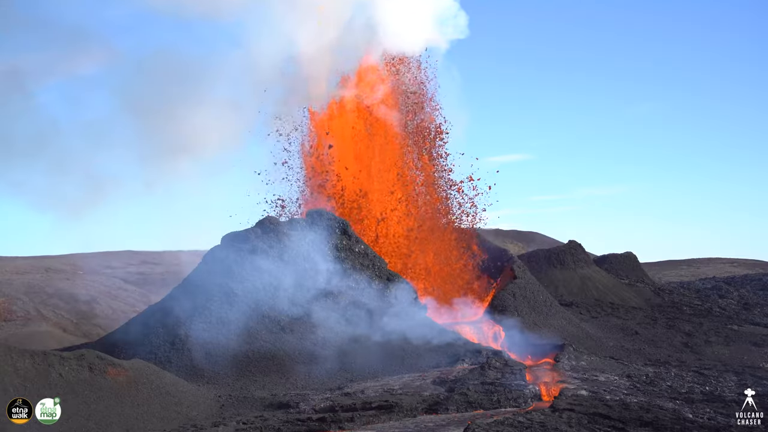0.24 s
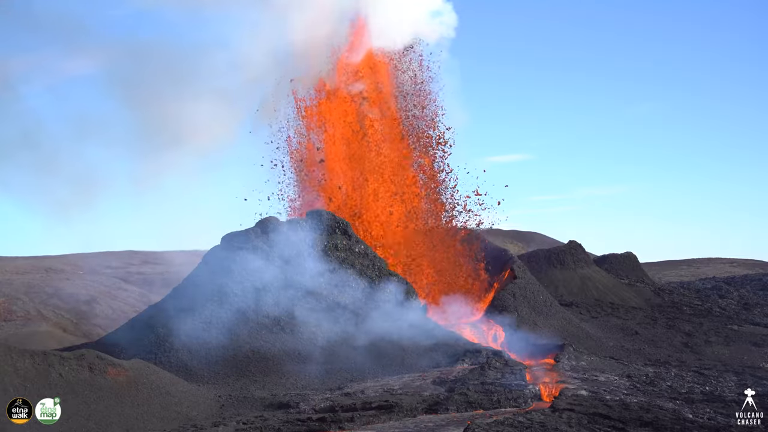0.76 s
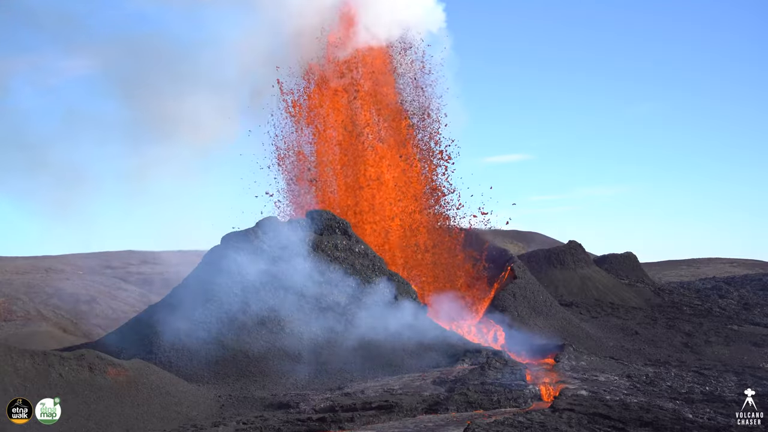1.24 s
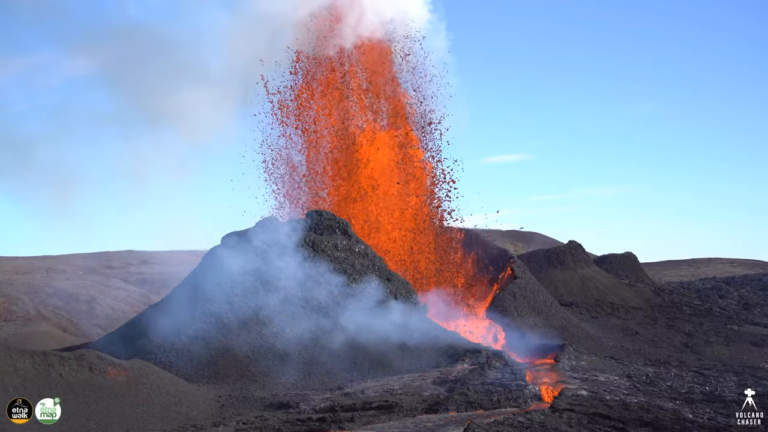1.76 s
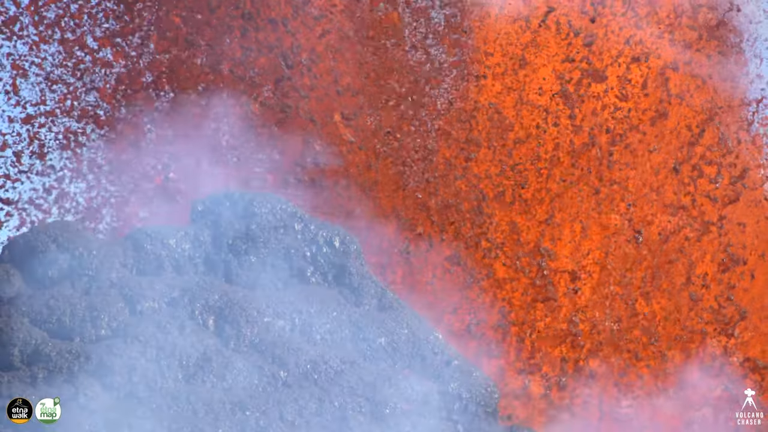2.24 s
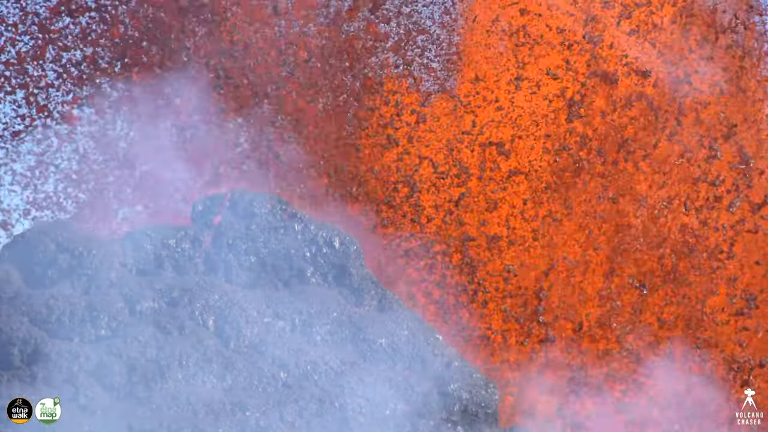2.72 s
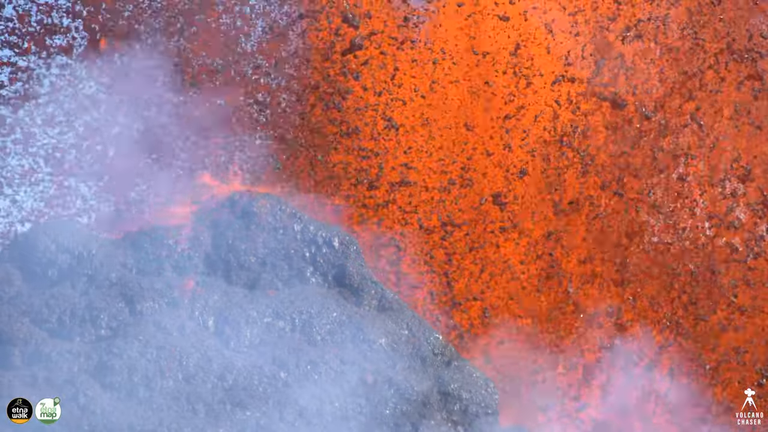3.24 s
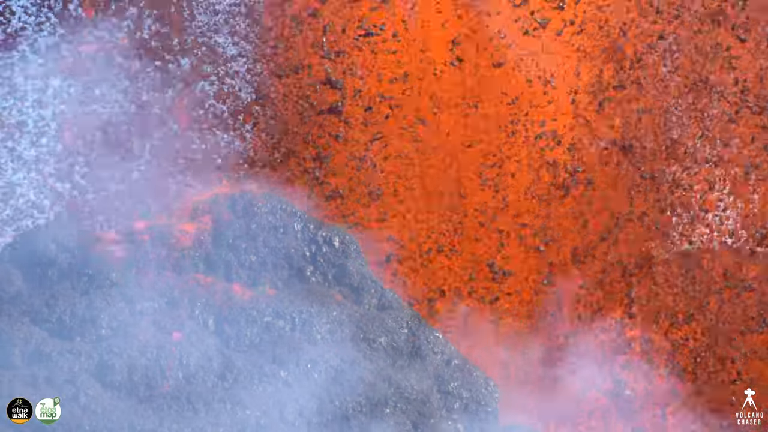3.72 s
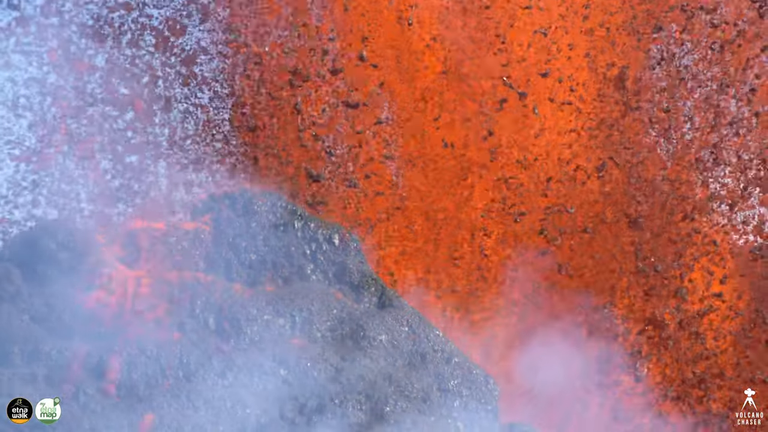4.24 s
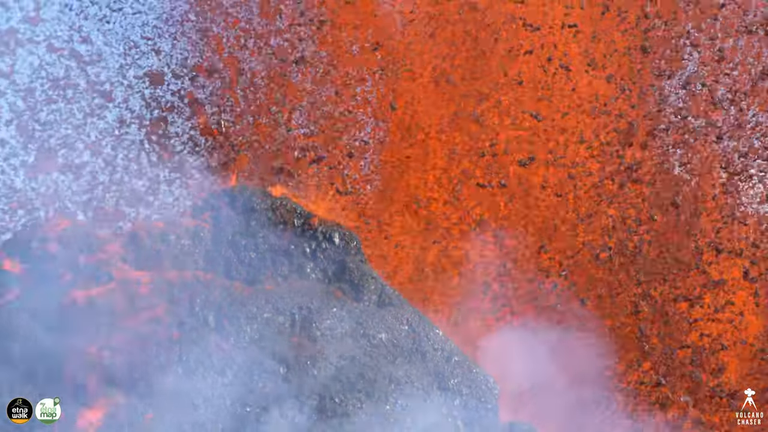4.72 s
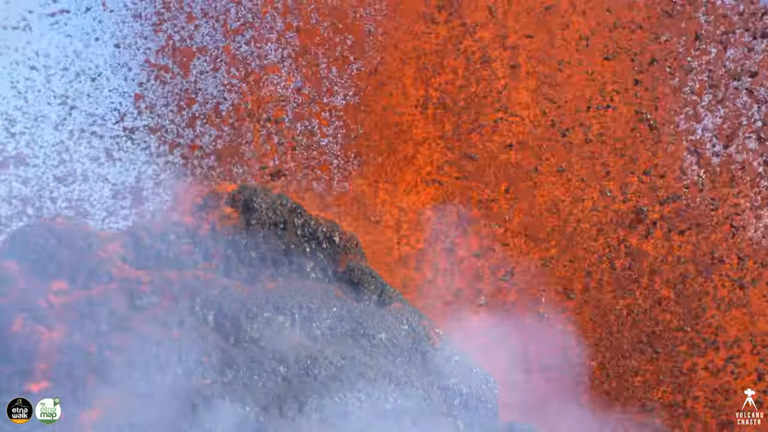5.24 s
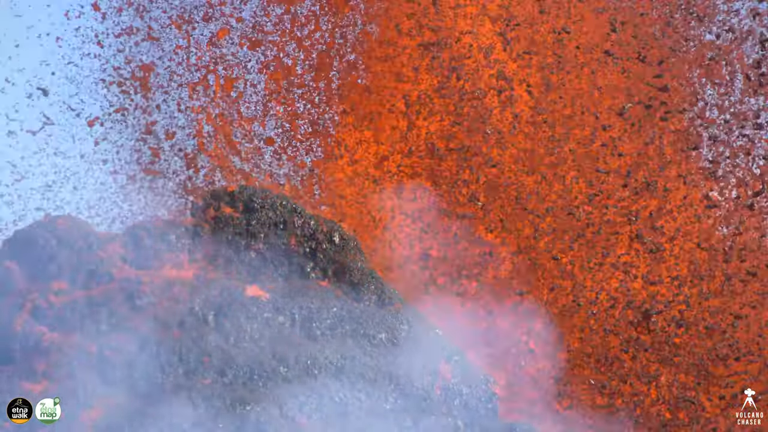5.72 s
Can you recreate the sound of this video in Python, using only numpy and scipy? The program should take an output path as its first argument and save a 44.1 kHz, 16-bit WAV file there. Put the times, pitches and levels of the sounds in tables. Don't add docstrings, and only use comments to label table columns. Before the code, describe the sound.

Steady broadband rumble and rush of a far volcanic vent, dark and without sparkle, nearly centred in a stereo outdoor pickup. An early surge is followed by a quieter, boomier stretch, then a gradual return to fuller, slightly clearer roaring. Low wind puffs bump the left side up to about three seconds and fade away. Sparse minute ticks fall close by, one distinct on the left past four seconds.

```python
import sys
import numpy as np
from scipy import signal
from scipy.fft import rfft, irfft, next_fast_len
from scipy.io import wavfile
from scipy.ndimage import uniform_filter1d, map_coordinates

SR = 44100
rng = np.random.default_rng(int(sys.argv[2]) if len(sys.argv) > 2 else 0)


def unload_wav(signal):
    wavfile.write(
        sys.argv[1],
        SR,
        np.round(np.clip(np.atleast_2d(signal).T, -1, 1) * 32767).astype(np.int16),
    )


def decibels_to_gain(level_db):
    exponent = np.asarray(level_db, float) / 20
    return 10 ** exponent


N = 263277

# time in seconds, jet strength in dB, vent throb over the jet in dB,
# clearness of the air path in dB.
FOUNTAIN_COURSE = [(0, -45.5, 2.5, -0.5), (.15, -43, 1.5, -0.5), (.4, -39.5, -2.5, -2),
                   (.82, -37.5, -1, -2.5), (1.1, -39.5, 1, -0.6), (1.6, -42.5, 0, -.5),
                   (1.95, -42.5, -0.5, .5), (2.3, -42, 2, 0.4), (2.8, -42, 4, -0.5), (3.3, -40, 4, 0),
                   (3.6, -38, 1, 0), (4.2, -38.5, 3, .5), (4.7, -37.5, 0.5, 0.8), (4.95, -37, 3, .5),
                   (5.2, -37.5, 0.5, 1), (5.6, -38, 2, 1), (5.97, -36, -0.5, 0.5)]
# frequency in Hz, level in dB per Hz.
ROAR_SPECTRUM = [(12, -43), (20, -10.5), (50, -4), (100, -1), (140, -2), (195, -10), (300, -9), (447, -9.5),
                 (620, -14.5), (1250, -17.5), (2500, -35.5), (3300, -46.5), (4000, -56.5), (4800, -68),
                 (7000, -100)]
# frequency in Hz, left over right in dB,
# lead of the right port in radians.
PORT_DIFFERENCES = [(59.5, 1.5, 0.23), (170, 0.5, 0.39), (215, 2, 0.44), (302, -2.5, -0.016),
                    (402, -0.4, 0.23), (550, -2.5, 0.32), (617, -1, 0.41), (670, -5, -0.038),
                    (780, 2.5, .08), (900, -2.5, 0.47), (1100, -1.5, -.07), (1530, -1, -0.14),
                    (1750, -3.5, -0.15), (2120, 0.5, -0.7), (2350, -1.5, 0)]
# frequency in Hz, likeness from 0 to 1.
PORT_LIKENESS = [(100, 1), (200, 0.99), (400, 0.99), (620, 1), (1200, .99), (1900, 1), (2600, 1),
                 (4000, 0.91)]
# time of the peak in seconds, peak level in dB, length in seconds.
GUST_SWELLS = [(.08, -49.5, 0.45), (.78, -47.5, .2), (1.05, -40, 0.22), (1.6, -52.5, .5), (1.97, -44, .25),
               (2.27, -42, 0.41), (2.7, -49, 0.45), (3.05, -49, .4), (3.6, -48, 0.18), (4.05, -52, .2),
               (4.75, -55.5, .3)]
# frequency in Hz, level in dB.
BUFFET_SPECTRUM = [(12, -13), (25, -1), (45, 1), (75, -14.5), (150, -22.5), (400, -60.5), (900, -120)]
# time in seconds, peak level in dB, length in ms, left over right in dB.
WIND_PUFFS = [
    (.95, -34, 30, 7),
    (2.122, -35, 22, 8),
    (2.288, -33.5, 27, 16),
    (2.6, -36, 28, 13),
    (2.931, -32, 32, 13),
]
# time of the peak in seconds, peak level in dB, length in seconds.
RUSTLE_SWELLS = [
    (2.3, -91.5, 2.6),
    (.1, -93, .4),
    (.95, -92, .6),
    (1.7, -94, .2),
    (2.04, -92, .25),
    (2.4, -94, 0.18),
    (2.62, -94, .2),
    (2.95, -91.5, .3),
    (3.36, -92, .2),
    (5.8, -98, .5),
]
# time in seconds, dull peak in dB, bright peak in dB, bright pitch in Hz,
# left over right in dB.
GRIT_GRAINS = [(0.3622, -73, -68.5, 9800, 1.5), (0.3891, -79, -72, 10800, 3),
               (0.5429, -62, -56.5, 10360, 2), (0.643, -67, -66, 8540, 1), (0.8403, -77, -66, 10500, -1),
               (1.2039, -75.5, -73.5, 9300, 7.5), (1.6335, -68, -70.5, 8500, 12),
               (1.8028, -56, -50, 9230, 16), (1.9042, -82, -56.5, 12340, -6.5),
               (1.91, -84, -72.5, 12600, -2), (2.1031, -78, -64.5, 12570, 3), (2.4926, -58, -76, 9300, 4),
               (2.6959, -50.5, -62.5, 9000, 7), (2.8381, -76, -81, 10500, 0),
               (2.9361, -61, -62, 10860, 0.5), (3.349, -66, -68, 10300, -1), (3.8395, -65.5, -65, 9400, -4),
               (4.2448, -33.5, -39, 9070, 13.5), (5.0226, -66.5, -57.5, 9300, 16),
               (5.1442, -68, -70.5, 10560, 1), (5.3587, -76.5, -68.5, 9200, 6),
               (5.6579, -66.5, -61, 9350, -1)]
# frequency in Hz, level in dB.
HISS_SPECTRUM = [(1000, -7), (5000, 0), (6500, -2.5), (8500, -2.5), (12000, -4), (16000, -10)]

BOOM_TOP_HZ, RUSH_FOOT_HZ, SPRAY_FOOT_HZ = 190, 740, 2200
BOOM_DB, BODY_DB, RUSH_DB, SPRAY_DB = 0.5, 0, -7.5, -24
RUSH_GROWS, SPRAY_GROWS = 0.96, 0.93
SPRAY_CLEARS = 2.8
CALM_DB, CALMING_DB_PER_S = -55.5, 1.1
FAINT_TOP_HZ = 12100


def unit(x):
    return x / np.sqrt(np.mean(x ** 2) + 1e-20)


def along(points, hz, axis=1):
    table = np.transpose(points)
    return np.interp(np.log(hz + 1), np.log(table[0] + 1), table[axis])


def curves(rows):
    s, *columns = np.transpose(rows)
    return [np.interp(np.arange(N) / SR, s, column) for column in columns]


def wobble(rate):
    knots = rng.standard_normal(int(N * rate / SR) + 4)
    return map_coordinates(knots, [np.arange(N) * rate / SR])


def swells(rows):
    t = np.arange(N) / SR
    power = sum(decibels_to_gain(2 * db) * np.exp(-(2 * (t - s) / length) ** 2 * 2) for s, db, length in rows)
    return np.sqrt(power)


def filtered(x, response):
    m = next_fast_len(N + SR // 2)
    hz = np.fft.rfftfreq(m, 1 / SR)
    return irfft(rfft(x, m) * response(hz), m)[..., :N]


def above(hz, edge_hz):
    return 1 / (1 + (edge_hz / (hz + 1)) ** 8)


def turbulence(patchy_db):
    z = signal.stft(rng.standard_normal((2, N + 1024)), nperseg=1024)[2]
    patches = uniform_filter1d(rng.standard_normal(z.shape[1:]), size=8, axis=0)
    patches = uniform_filter1d(patches, size=16, axis=1)
    return signal.istft(z * decibels_to_gain(patchy_db * unit(patches)), nperseg=1024)[1][:, :N]


def from_afar(share, patchy_db):
    def common_and_scattered(hz):
        colour = decibels_to_gain(along(ROAR_SPECTRUM, hz)) * np.sqrt(share(hz))
        turn = np.arccos(np.clip(along(PORT_LIKENESS, hz), -1, 1)) / 2
        return colour * [np.cos(turn), np.sin(turn)]

    def ports(hz):
        level = decibels_to_gain(along(PORT_DIFFERENCES, hz) / 2)
        left = level * np.exp(-.5j * along(PORT_DIFFERENCES, hz, axis=2))
        return np.array([left, 1 / left])

    mid, side = filtered(turbulence(patchy_db), common_and_scattered)
    return unit(filtered(np.array([mid + side, mid - side]), ports))


def fountain():
    jet_db, throb_db, clear_db = curves(FOUNTAIN_COURSE)
    surge_db = jet_db - jet_db.mean()

    def between(low_hz, high_hz):
        return lambda hz: above(hz, low_hz) * (1 - above(hz, high_hz))

    boom = from_afar(lambda hz: 1 - above(hz, BOOM_TOP_HZ), patchy_db=0.03)
    boom = boom * decibels_to_gain(surge_db + throb_db + BOOM_DB)
    body = from_afar(between(BOOM_TOP_HZ, RUSH_FOOT_HZ), patchy_db=1.1)
    body = body * decibels_to_gain(surge_db + BODY_DB)
    rush = from_afar(between(RUSH_FOOT_HZ, SPRAY_FOOT_HZ), patchy_db=0.96)
    rush = rush * decibels_to_gain(RUSH_GROWS * surge_db + clear_db + RUSH_DB)
    spray = from_afar(lambda hz: above(hz, SPRAY_FOOT_HZ), patchy_db=0.5)
    spray = spray * decibels_to_gain(SPRAY_GROWS * surge_db + SPRAY_CLEARS * clear_db + SPRAY_DB)
    return decibels_to_gain(jet_db.mean() + 0.25 * wobble(3)) * (boom + body + rush + spray)


def gusts():
    t = np.arange(N) / SR
    lumps = decibels_to_gain(3.3 * np.array([wobble(21), wobble(21)]))
    noise = filtered(rng.standard_normal((2, N)), lambda hz: decibels_to_gain(along(BUFFET_SPECTRUM, hz)))
    breeze = decibels_to_gain(CALM_DB - CALMING_DB_PER_S * t)
    strength = np.hypot(swells(GUST_SWELLS), breeze)
    wind = strength * decibels_to_gain(np.array([[2], [-2]])) * unit(lumps * noise)
    for s, db, ms, pan_db in WIND_PUFFS:
        u = (t - s) / (ms / 4000)
        push = (1 - u * u) * np.exp(-u * u / 2)
        wind = wind + decibels_to_gain(db + np.array([[pan_db / 2], [-pan_db / 2]])) * push
    return wind


def rustle():
    crackle = rng.standard_normal(N) * decibels_to_gain(3 * wobble(60))
    thin = filtered(crackle, lambda hz: np.sqrt(above(hz, 6000)) * (hz < FAINT_TOP_HZ))
    return swells(RUSTLE_SWELLS) * unit(thin)


def grit():
    out = np.zeros((2, N + SR))
    t = np.arange(200) / SR
    draws = rng.standard_normal((len(GRIT_GRAINS), 2, len(t)))
    for (s, dull_db, bright_db, bright_hz, pan_db), noise in zip(GRIT_GRAINS, draws):
        dull = np.sin(2 * np.pi * 3700 * t) * decibels_to_gain(dull_db + 10.5 - 60 * t / 0.00056)
        bright = np.sin(2 * np.pi * bright_hz * t) * decibels_to_gain(bright_db + 8 - 60 * t / 0.00075)
        rattle = noise * decibels_to_gain(max(dull_db, bright_db) - 22.0 - 60 * t / .003)
        left_share = 1 / (1 + decibels_to_gain(-2 * pan_db))
        snap = (dull + bright) * np.sqrt([[left_share], [1 - left_share]]) + rattle
        start = round(s * SR) - 3
        out[:, start:start + len(t)] += snap

    def housing_and_ground(hz):
        band = np.sqrt(above(hz, 2000) * (1 - above(hz, 13000))) * (1 - above(hz, 13200)) ** 2
        echo = 1 + decibels_to_gain(-20) * np.exp(-2j * np.pi * hz * .0057)
        return band * echo

    return filtered(out[:, :N], housing_and_ground)


def scene():
    return fountain() + gusts() + rustle() + grit()


def roll_off(x):
    return signal.sosfilt(signal.butter(12, 14200, fs=SR, output="sos"), x)


def record(dry):
    hiss = filtered(rng.standard_normal((2, N)),
                    lambda hz: decibels_to_gain(along(HISS_SPECTRUM, hz)) * (hz < FAINT_TOP_HZ))
    opening = np.sin(np.pi / 2 * np.clip(np.arange(N) / (.006 * SR), 0, 1)) ** 2
    return roll_off(dry * opening + decibels_to_gain(-87.0) * unit(hiss))


dry = scene()
out = record(dry)
unload_wav(out)
```